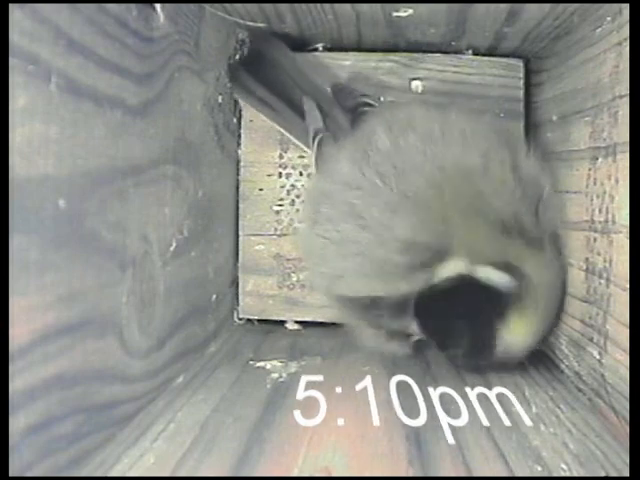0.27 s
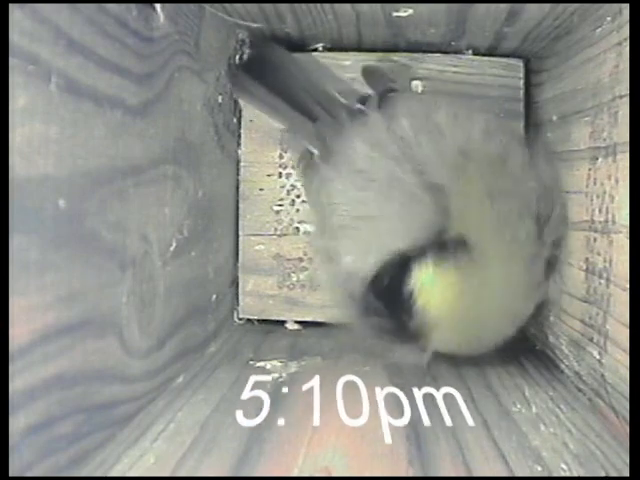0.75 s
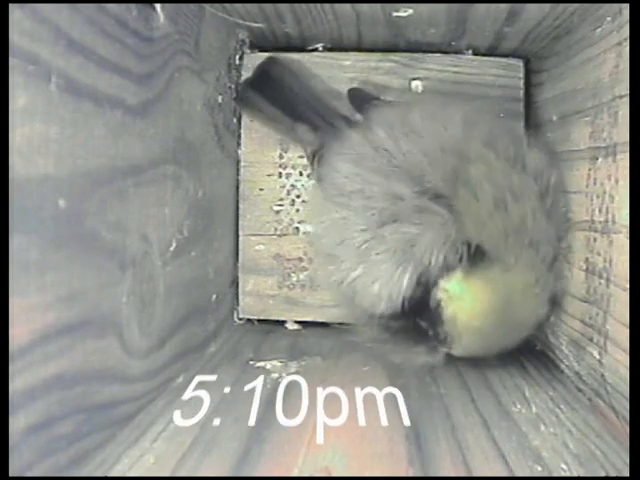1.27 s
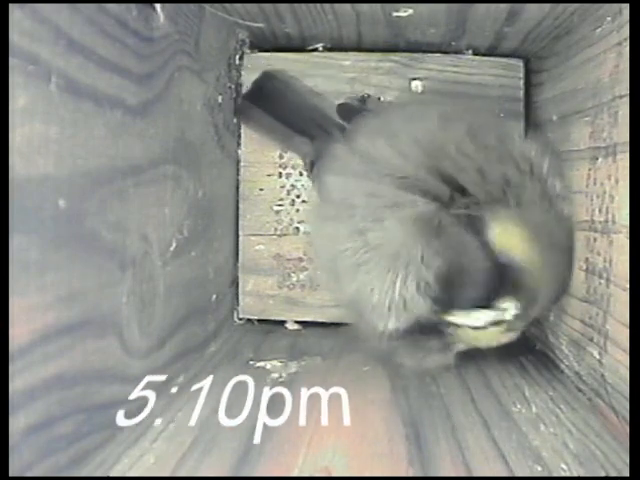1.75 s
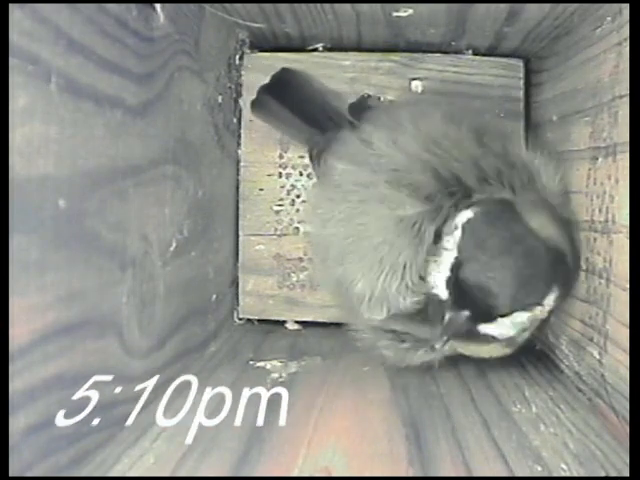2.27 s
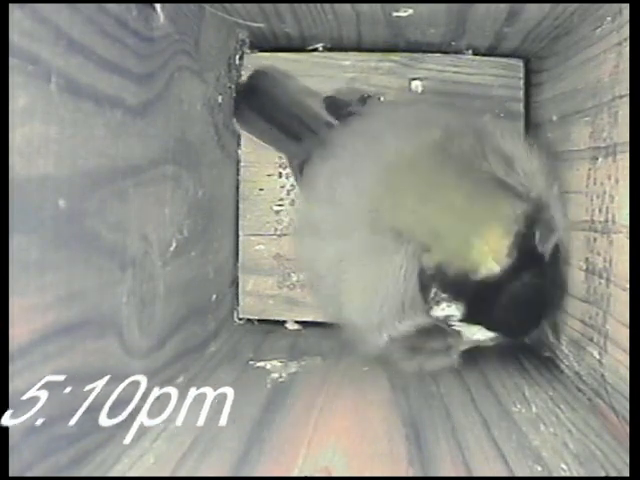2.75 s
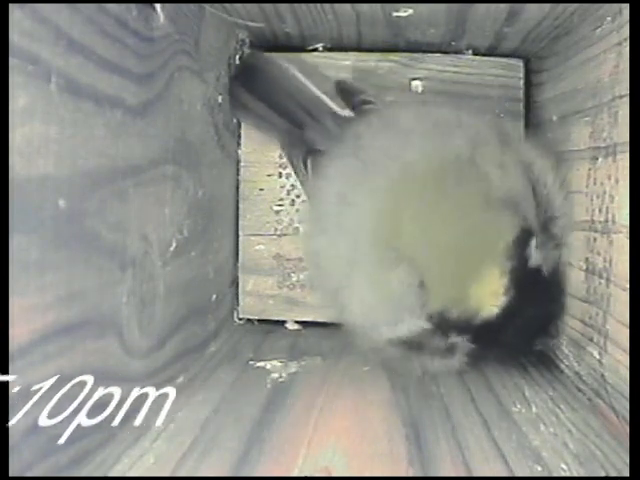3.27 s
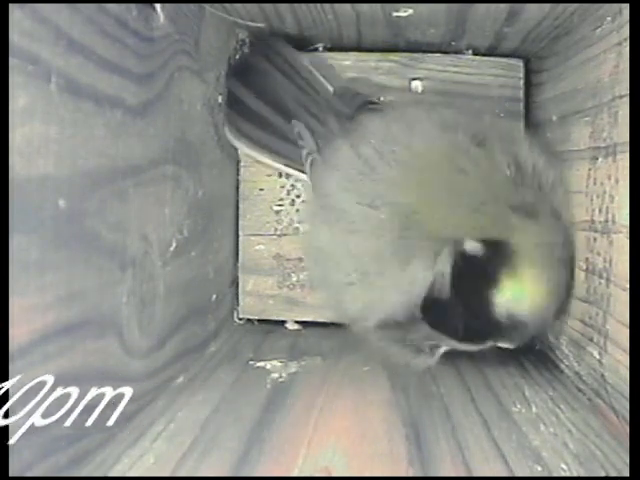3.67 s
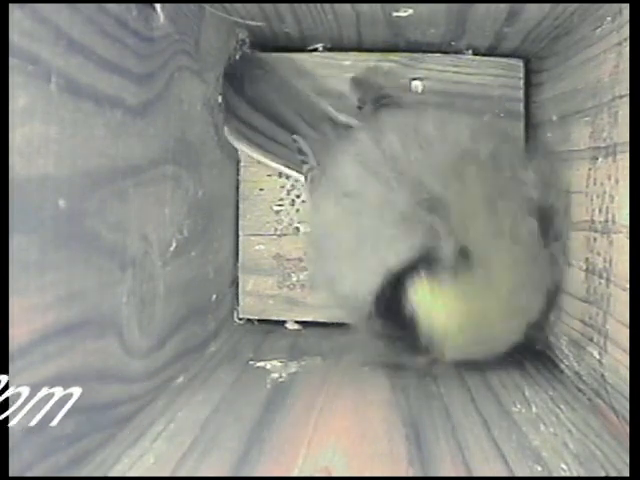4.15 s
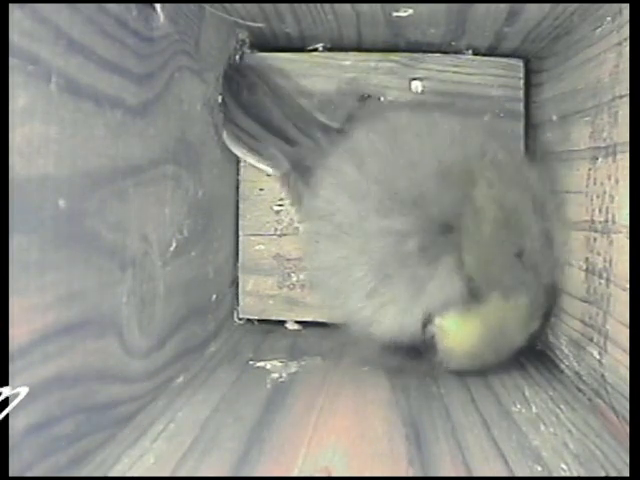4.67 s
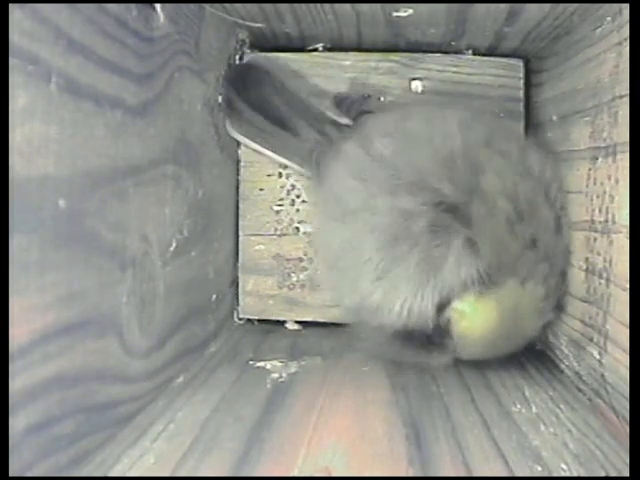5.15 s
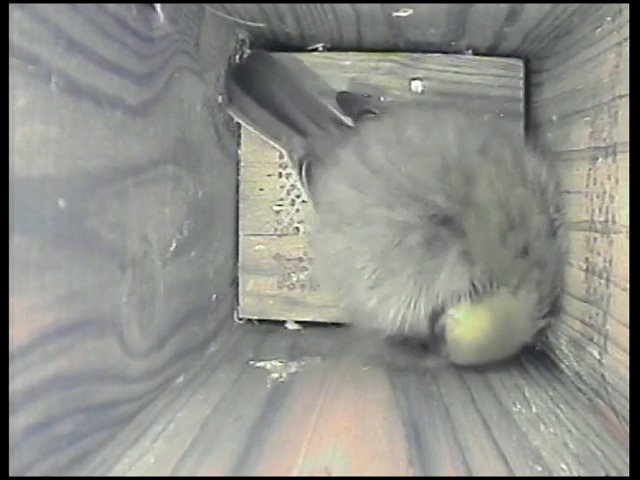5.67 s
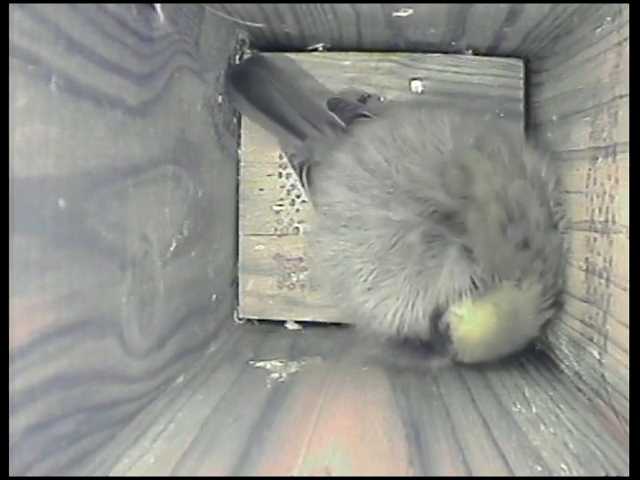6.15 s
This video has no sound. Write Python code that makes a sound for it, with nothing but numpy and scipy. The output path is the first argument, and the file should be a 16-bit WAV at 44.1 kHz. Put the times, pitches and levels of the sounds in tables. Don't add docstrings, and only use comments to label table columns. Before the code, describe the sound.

A steady hollow drone from outdoors fills a tiny wooden box, with faint hiss and a piercing-thin electronic whine. Near the microphone a small bird works through its plumage: papery strokes, crisp flicks, light claw scrapes and beak taps that ring briefly on the panels. Two taps stand out, one early and one mid-way with a ripping wing brush; later the rustling grows denser, with dull low bumps, then thins out.

```python
import sys
import numpy as np
from scipy import signal
from scipy.fft import rfft, irfft, next_fast_len
from scipy.io import wavfile
from scipy.ndimage import map_coordinates

SR = 44100
rng = np.random.default_rng(int(sys.argv[2]) if len(sys.argv) > 2 else 0)


def log_audio(samples):
    frames = np.atleast_2d(samples).T
    limited = np.clip(frames, -1, 1)
    pcm = np.round(limited * 32767).astype(np.int16)
    wavfile.write(sys.argv[1], SR, pcm)


def gain_from_db(level_db):
    decades = np.asarray(level_db, float) / 20
    return 10 ** decades


N = 282240

# t/s, level/dB
TRAFFIC = [(0, -49), (.6, -51), (1.5, -51.5), (2.46, -52.5), (2.82, -46), (3.01, -43), (3.2, -49),
           (3.5, -49.5), (4.12, -50.5), (4.63, -47.5), (5.08, -46.5), (5.51, -51), (5.83, -47.5),
           (6.15, -50.5), (6.3, -48.5), (6.4, -60)]
# t/s, level/dB
WIND = [(0, -59.5), (1.32, -62), (1.9, -60), (2.7, -59.5), (3.05, -57), (3.8, -57), (4.15, -61),
        (4.63, -55), (5.08, -60), (5.83, -53.5), (6.4, -54)]
# f/Hz, width/Hz, level/dB
CAVITY_MODES = [(315, 36.8, 9), (251.3, 36, -4.5), (385, 55, -51)]
# f/Hz, width/Hz, level/dB
UPPER_MODES = [(729, 68, 1), (1000, 292, -2), (1479, 172, 0), (1878, 100, -8), (513, 350, -7.5)]
# f/Hz, density/dB per Hz
RUMBLE_SPECTRUM = [(12, -37), (20, -12), (60, -6.5), (162, -11.5), (240, -3.5), (310, -25), (530, -120)]
UPPER_DB, UPPER_FOLLOWS = -58, 0.039

# f/Hz, density/dB per Hz
HISS_SPECTRUM = [(1120, -29), (1900, -1.5), (2110, -4.5), (2840, -5), (3160, -7.5), (5210, -10), (6560, -7),
                 (8880, -11.5), (9560, -12), (9800, -18.5), (13500, -19)]
SCAN_HZ, SUPPLY_HZ = 15625.4, 9288

# t/s, level/dB
PREENING = [(0, -69.5), (.23, -74), (.4, -67), (.87, -62.5), (1.15, -69.5), (1.6, -76), (2.4, -76),
            (2.8, -64.5), (3.05, -72), (3.4, -62.5), (3.78, -59), (3.84, -72), (4.02, -64), (4.35, -65),
            (4.8, -72), (5.2, -67.5), (5.65, -69.5), (6.4, -75)]
# peak t/s, level/dB, length/s
STROKES = [(0.323, -62.5, 0.11), (.57, -65.5, 0.093), (1.075, -56.5, 0.076), (1.318, -65, 0.14),
           (1.508, -63.5, .12), (1.678, -64, .04), (1.863, -62.5, 0.12), (2.05, -70, .1), (2.26, -69, .12),
           (2.806, -63, .06), (2.996, -66, .06), (3.136, -57, 0.078), (3.206, -58.5, 0.057),
           (3.339, -55, 0.085), (3.56, -56, .05), (3.65, -57, 0.05), (3.923, -57, 0.092), (4.431, -56, .09),
           (4.506, -56.5, .07), (4.56, -55.5, 0.086), (4.62, -57.5, .04), (4.693, -57.5, 0.074),
           (4.83, -59, .09), (4.992, -55, 0.077), (5.085, -57, 0.07), (5.216, -61.5, .1),
           (5.328, -55, 0.052), (5.471, -55, .12), (5.596, -56.5, 0.067), (5.91, -62, 0.1),
           (5.51, -61, .05), (5.805, -63, .07)]
STROKE_RISE, STROKE_FALL, STROKE_DEPTH_DB, STROKE_ROUNDNESS = 0.61, 0.37, 12, 1.43
# f/Hz, density/dB per Hz
BARB_SPECTRUM = [(1290, -4.5), (2200, -15), (2600, -13), (3940, -8), (4800, -3.5), (5240, -6), (5760, 1),
                 (6330, -2), (6850, 2.5), (9400, -5), (10000, -12.5), (10900, -7), (14500, -30)]
# t/s, peak level/dB, shaft level/dB
FLICKS = [(.8589, -42, -5), (1.062, -25, -9), (1.078, -43, -8), (1.29, -43, -10), (1.31, -44, -11),
          (1.5479, -43, -17), (1.6746, -41, -13), (1.69, -32, -8), (1.8485, -35, -2), (2.018, -44, -12),
          (2.0302, -29.5, -8.5), (2.253, -42.5, -4), (2.7965, -41, -17), (3.19, -43, -14),
          (3.6347, -39, -16), (3.6736, -42, -11), (3.7365, -38, -16), (3.9056, -43, -15),
          (3.9246, -45, -10), (4.0772, -40.5, -6), (4.1531, -42.5, -10), (4.5604, -34.5, -9),
          (4.6863, -40, -10), (4.8255, -40, -8), (4.8375, -37.5, -12), (5.4576, -39, -14),
          (5.5978, -39, -16), (5.711, -42, -16), (5.9101, -43, -7), (5.93, -41.5, -3)]
# t/s, peak level/dB
DOWN = [(.4753, -49), (.6384, -47), (4.8699, -44), (.841, -50), (.9657, -45), (1.1318, -45), (1.817, -47),
        (2.6653, -45.5), (2.7057, -52), (2.9033, -45), (2.9936, -44.5), (3.1253, -44), (3.2375, -45),
        (3.4342, -47), (3.4631, -45), (3.5454, -47), (3.7914, -42), (4.0025, -43), (4.4289, -46),
        (4.5132, -46), (4.607, -47), (4.6709, -45), (4.7811, -46), (4.9652, -45), (4.9752, -42),
        (4.9882, -43), (5.2979, -49), (5.3254, -44), (5.4157, -47), (5.5703, -43)]
# t/s, peak level/dB
MORE_TICKS = [(1.0555, -42), (1.072, -43), (1.8425, -45), (1.8595, -44), (1.8885, -46), (3.680, -43),
              (4.4062, -47), (4.480, -48), (4.570, -45), (4.6127, -46), (4.6312, -46), (4.7085, -48),
              (4.7225, -50), (4.8073, -48), (5.142, -52), (5.2184, -49), (5.2578, -48), (5.4458, -45),
              (5.474, -46), (5.4992, -48), (5.516, -47), (5.620, -49), (5.7841, -49), (5.803, -50),
              (5.820, -49), (5.8918, -48)]
# t/s, peak level/dB, t60/s, rise/s, shaft level/dB
RIP = [
    (3.3005, -39, .014, .001, -10),
    (3.3158, -17.5, 0.014, 0.00046, -14),
    (3.3235, -30, .03, .002, -12),
    (3.3305, -31, 0.015, .002, -13),
    (3.3345, -23.5, .02, 0.002, -13),
    (3.338, -34, .012, .001, -9),
]
# f/Hz, width/Hz, level/dB
TIP_MODES = [(7180, 450, -6), (7850, 450, -1), (9520, 400, -11), (10700, 800, -11)]
# f/Hz, width/Hz, level/dB
SHAFT_MODES = [(5840, 340, 2), (4600, 420, -5), (3730, 240, -9), (2730, 240, -8)]
FLICK_T60_S, FLICK_RISE_S = 0.013, 0.0014
TICK_T60_S, TICK_RISE_S, TICK_GAIN_DB, TICK_SHAFT_DB = .006, .0005, 5.5, -9

# t/s, peak level/dB, f/Hz
PUSHES = [(0.511, -48, 55), (0.701, -48, 50), (.95, -46, 55), (1.079, -41.5, 85), (1.45, -53, 60),
          (2.158, -39, 110), (2.172, -46, 115), (2.184, -37.5, 115), (2.3, -45, 55), (3.35, -45, 60),
          (3.45, -50, 45), (3.551, -47, 45), (3.716, -49, 60), (4.548, -36, 105), (4.673, -38.5, 100),
          (4.813, -39, 75), (4.976, -51, 50), (5.052, -44, 85), (5.298, -42.5, 60), (5.4, -55, 45),
          (5.566, -50, 60), (5.886, -48, 55), (5.981, -50, 100)]
# t/s, jolt level/dB, jolt f/Hz, ring level/dB
SNAPS = [
    (3.2948, -32, 800, -50),
    (3.7368, -38, 330, -45),
    (4.5578, -33, 270, -43),
    (4.6868, -42, 330, -49),
]
SNAP_HZ, SNAP_T60_S = 1680, .016

# t/s, length/s, panel f/Hz, rms level/dB, scratch level/dB
SCRAPES = [(0.961, 0.039, 1000, -52, -71), (1.073, 0.029, 1000, -50, -71), (1.246, 0.067, 950, -54, -73),
           (1.65, 0.04, 957, -53, -83), (2.789, 0.05, 945, -54, -79), (3.105, 0.057, 1530, -60, -82),
           (3.326, 0.016, 1610, -55, -52), (3.674, 0.028, 760, -43.5, -57), (1.265, .04, 1500, -55, -80),
           (1.279, .022, 2730, -65, -80), (4.844, 0.17, 763, -54.5, -84), (5.041, 0.19, 1000, -65, -84),
           (5.551, 0.098, 803, -55.5, -82), (5.668, 0.059, 870, -51.5, -80), (5.68, 0.032, 1520, -56, -77)]

# t/s, peak level/dB, lower panel level/dB, upper panel level/dB, click level/dB
TAPS = [(.97, -34.5, -17, -14, 0), (1.181, -30.5, -31, -18, -6), (1.551, -34, -25, -20, 0),
        (1.666, -39, -21, -8, 0), (1.689, -13.5, -23, -25, 1), (1.702, -30, -31, -20, -14),
        (1.819, -35, -22, -13.5, 4), (2.013, -35.5, -25, -20, -5), (2.017, -34, -22, -6, 0),
        (2.0286, -26, -23, -22, -8), (2.0307, -30, -26, -8, 5), (2.075, -40.5, -31, -17, 0),
        (2.569, -42, -23, -27, 0), (2.762, -32, -29, -32, 0), (2.795, -31.5, -31, -30, 0),
        (2.809, -37.5, -23, -14, 0), (2.84, -39, -21, -9, 0), (3.106, -48.5, -22, 2, 0),
        (3.115, -24.5, -17, -32, 0), (3.129, -29, -27, -32, 0), (3.294, -44, -12.5, -12, 0),
        (3.3147, -36, -23, -11, -5), (3.317, -18.5, -24, -13, 6), (3.332, -44, -11, 0, 14),
        (3.442, -32.5, -15, -19, 0), (3.737, -50, -20, -1.5, 0), (4.089, -44, -4, -14, 0),
        (4.557, -48, -6, -7, 0), (4.686, -44, -18, -6.5, 0), (5.458, -45, -8, -9, 0),
        (5.595, -53, -2, -10, 0), (5.685, -41.5, -18, -3, 0)]
# t/s, peak level/dB
TOES = [(1.071, -44), (1.132, -47), (1.248, -42), (1.269, -41), (1.289, -40.5), (1.488, -42.5),
        (1.651, -44), (1.895, -42), (1.911, -43), (2.618, -45.5), (2.904, -44), (3.434, -44), (3.522, -42),
        (3.619, -44), (3.966, -43.5), (1.085, -43), (1.103, -45), (1.195, -42), (1.325, -44), (3.675, -45),
        (3.68, -45), (1.23, -46), (1.255, -43), (1.278, -44), (1.297, -44), (3.505, -46)]
# f/Hz, level/dB, t60/s
PANEL_MODES = [(264, -5.5, 0.06), (500, -5, 0.04), (755, 0, 0.05), (815, 4.5, 0.03), (930, 1.5, 0.031),
               (1000, -14, .03), (1152, -14, 0.045), (1540, -4, 0.039), (1720, -14.5, 0.04),
               (2725, -23, 0.028), (3720, -32, .022), (4550, -27, .014), (5700, -27, 0.018),
               (7950, -25, .013)]
TOE_LOWER_DB, TOE_UPPER_DB, TOE_CLICK_DB = -23, -13, -1
RING_SHARE, DAMPING_PER_DB = 0.82, .005
CONTACT_S = .0007


def unit(x):
    return x / np.sqrt(np.mean(x ** 2) + 1e-20)


def curves(rows):
    s, *cols = np.transpose(rows)
    return [np.interp(np.arange(N) / SR, s, c) for c in cols]


def wobble(rate_hz):
    knots = rng.standard_normal(int(N * rate_hz / SR) + 4)
    return map_coordinates(knots, [np.arange(N) * rate_hz / SR])


def filtered(x, response):
    m = next_fast_len(len(x) + 8192)
    return irfft(rfft(x, m) * response(np.fft.rfftfreq(m, 1 / SR)), m)[:len(x)]


def coloured(points):
    f, db = np.transpose(points)
    return lambda hz: gain_from_db(np.interp(np.log(hz + 1), np.log(f + 1), db))


def resonant(peaks):
    def response(f):
        total = 0
        for k, (centre, width, db) in enumerate(peaks):
            damping = 1j * f * width
            total = total + (-1) ** k * gain_from_db(db) * damping / (centre * centre - f * f + damping)
        return total
    return response


def noise(response):
    return unit(filtered(rng.standard_normal(N), response))


def outdoors():
    cavity_db, = curves(TRAFFIC)
    wind_db, = curves(WIND)
    upper_db = UPPER_DB + UPPER_FOLLOWS * (cavity_db - cavity_db.mean())
    cavity_colour = lambda f: resonant(CAVITY_MODES)(f) / (1 + (f / 450) ** 4)
    upper_colour = lambda f: resonant(UPPER_MODES)(f) / (1 + (f / 2000) ** 8)
    cavity = gain_from_db(cavity_db + 0.48 * wobble(3.48)) * noise(cavity_colour)
    upper = gain_from_db(upper_db + 0.78 * wobble(5)) * noise(upper_colour)
    rumble = gain_from_db(wind_db + 2.5 + 1.3 * wobble(6)) * noise(coloured(RUMBLE_SPECTRUM))
    return cavity + upper + rumble


def camera():
    t = np.arange(N) / SR
    scan = gain_from_db(-50.5) * np.sin(2 * np.pi * SCAN_HZ * t)
    supply = gain_from_db(-77 + 1.5 * wobble(27)) * np.sin(2 * np.pi * SUPPLY_HZ * t + .9 * wobble(30))
    hiss = gain_from_db(-70) * noise(lambda f: coloured(HISS_SPECTRUM)(f) / (1 + (f / 14300) ** 40))
    skirt = gain_from_db(-88) * noise(lambda f: resonant([(15350, 500, 0)])(f) ** 3)
    return scan + supply + hiss + skirt


def combing():
    t = np.arange(N) / SR
    power = gain_from_db(curves(PREENING)[0]) ** 2
    for s, db, length_s in STROKES:
        away = np.maximum((s - t) / STROKE_RISE, (t - s) / STROKE_FALL) / max(length_s, .01)
        power = power + gain_from_db(db - STROKE_DEPTH_DB * away ** STROKE_ROUNDNESS) ** 2
    return np.sqrt(power)


def feathers():
    caught = rng.random(N) < 600 / SR
    strength = gain_from_db(np.minimum(5 * rng.exponential(size=N), 11))
    catches = caught * strength * np.sign(rng.standard_normal(N))
    grains = unit(catches) * 0.87 + rng.standard_normal(N)
    clumps = gain_from_db(1.1 * wobble(60) + 2.54 * wobble(220))
    rustle = gain_from_db(-2.7) * combing() * unit(filtered(unit(grains * clumps), coloured(BARB_SPECTRUM)))

    flicks = [(s, db, FLICK_T60_S, FLICK_RISE_S, shaft_db) for s, db, shaft_db in FLICKS]
    ticks = [(s, db + TICK_GAIN_DB, TICK_T60_S, TICK_RISE_S, TICK_SHAFT_DB)
             for s, db in list(DOWN) + list(MORE_TICKS)]
    gate = np.zeros((2, N + SR))
    t = np.arange(SR // 5) / SR - .02
    for s, db, t60_s, rise_s, shaft_db in flicks + ticks + list(RIP):
        loading = np.exp(t / max(rise_s, .0001))
        release = gain_from_db(-60 * t / max(t60_s, .005))
        burst = np.where(t < 0, loading, release)
        gate[:, round((s - .019) * SR):][:, :len(t)] += gain_from_db([[db - 4], [db + shaft_db]]) * burst
    tips, shaft = gate[:, :N] * np.sign(rng.standard_normal((2, N)))
    tip_colour = lambda f: resonant(TIP_MODES)(f) / (1 + (f / 12500) ** 8)
    return rustle + 2.0 * filtered(tips, tip_colour) + 1.5 * filtered(shaft, resonant(SHAFT_MODES))


def jolt(u):
    return u * (1 - u / 1.8) * np.exp(-u)


def pushes():
    out, t = np.zeros(N + SR), np.arange(SR // 5) / SR
    for s, db, hz in PUSHES:
        out[round(s * SR):][:len(t)] -= gain_from_db(db + 14.5) * jolt(t * hz * 5)
    for s, db, hz, ring_db in SNAPS:
        ring = gain_from_db(ring_db - 60 * t / SNAP_T60_S) * np.sin(2 * np.pi * SNAP_HZ * t)
        out[round(s * SR):][:len(t)] += gain_from_db(db + 13) * jolt(t * hz * 5) + ring
    return filtered(out[:N], lambda f: 1 / (1 + (f / 2300) ** 6))


def scrapes():
    out, t = np.zeros(N + SR), np.arange(SR // 5) / SR
    for s, length_s, hz, db, scratch_db in SCRAPES:
        rough = rng.standard_normal(len(t))
        stroke = np.sin(np.pi * np.clip(t / length_s, 0, 1) ** 0.67)
        panel = unit(filtered(rough, lambda f: resonant([(hz, hz / 12, 0)])(f) ** 2))
        scratch = unit(filtered(rough ** 3, lambda f: resonant([(3200, 3000, 0)])(f) ** 2))
        out[round(s * SR):][:len(t)] += stroke * (gain_from_db(db) * panel + gain_from_db(scratch_db) * scratch)
    return out[:N]


def taps():
    out, t = np.zeros(N + SR), np.arange(SR // 8) / SR
    toes = [(s, db + 1, TOE_LOWER_DB, TOE_UPPER_DB, TOE_CLICK_DB) for s, db in TOES]
    push = (1 - np.exp(-t / CONTACT_S)) ** 2
    for s, db, lower_db, upper_db, click_db in list(TAPS) + toes:
        ring_share = max(RING_SHARE - DAMPING_PER_DB * (db + 32), .2)
        ring = np.zeros(len(t))
        for hz, level_db, t60_s in PANEL_MODES:
            spread, detune = rng.standard_normal(2)
            if hz < 850:
                panel_db = lower_db + 9.5
            elif 1300 < hz < 2000:
                panel_db = upper_db + 12
            else:
                panel_db = click_db if hz > 2000 else 0
            decay_db = 60 * t / (t60_s * ring_share)
            tone = np.sin(2 * np.pi * hz * (1 + .005 * detune) * t)
            ring += gain_from_db(level_db + panel_db + 1.1 * spread - decay_db) * tone
        out[round(s * SR):][:len(t)] += gain_from_db(db - .6) * ring * push
    return out[:N]


def scene():
    return (outdoors() + taps() + scrapes() + feathers() + pushes() + camera())[None]


def band_limit(x):
    return signal.sosfilt(signal.butter(12, 16830, fs=SR, output="sos"), x)


def record(dry):
    mix = filtered(dry[0], lambda f: np.where(f < 15750, 1, gain_from_db(-60)))[None]
    return band_limit(mix)


dry = scene()
out = record(dry)
log_audio(out)
```